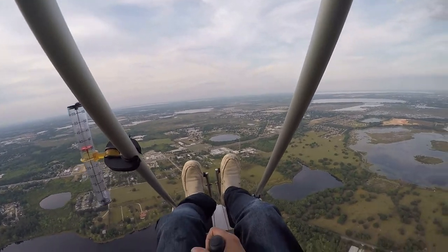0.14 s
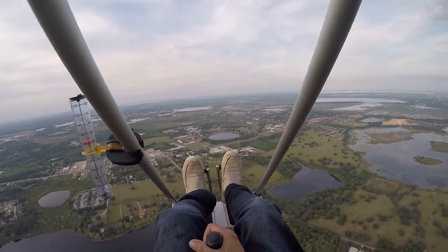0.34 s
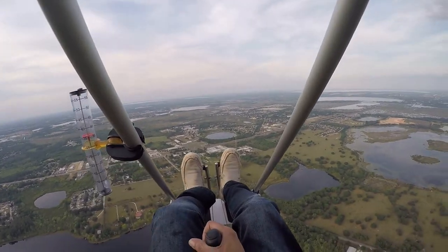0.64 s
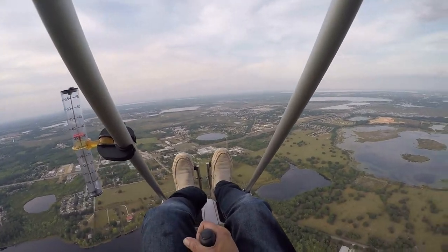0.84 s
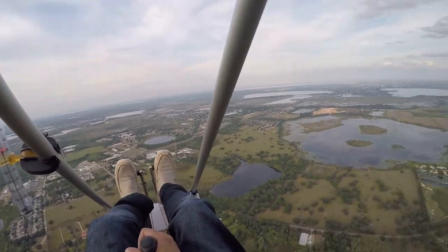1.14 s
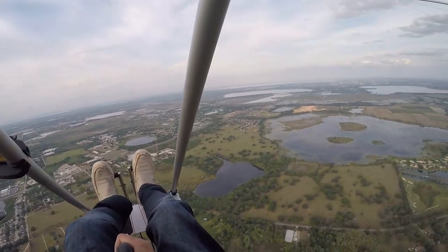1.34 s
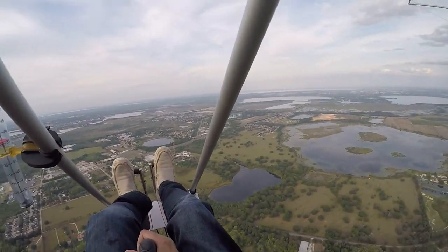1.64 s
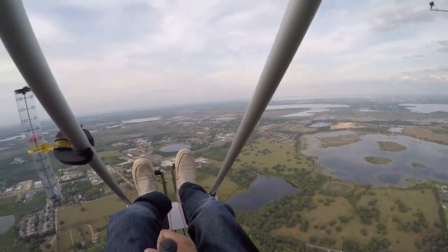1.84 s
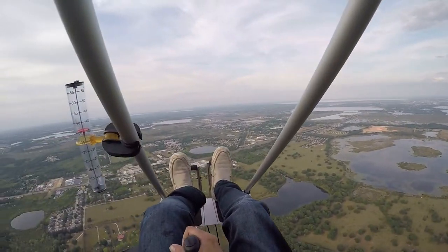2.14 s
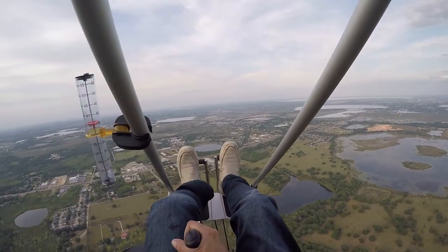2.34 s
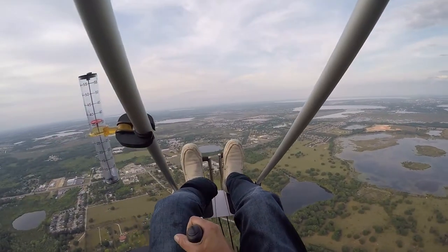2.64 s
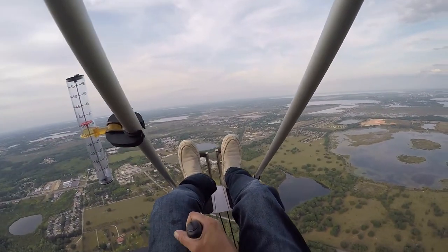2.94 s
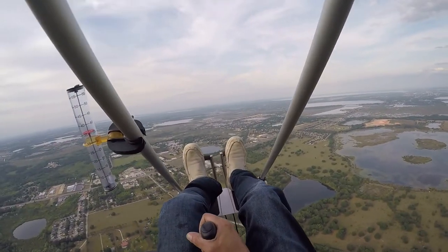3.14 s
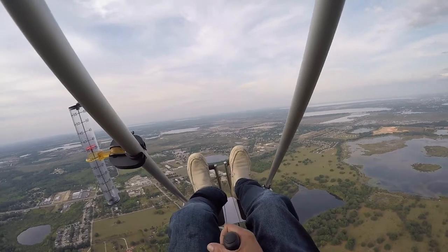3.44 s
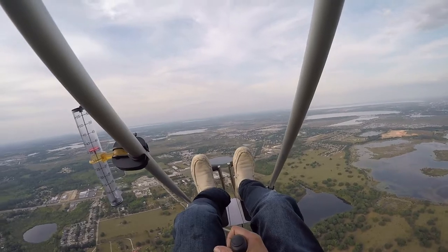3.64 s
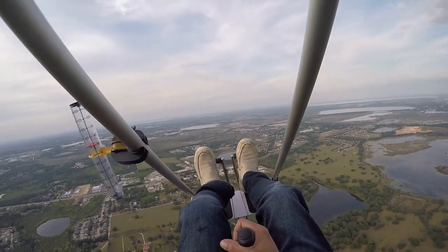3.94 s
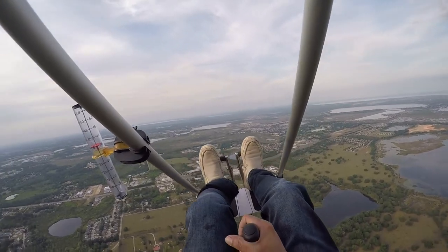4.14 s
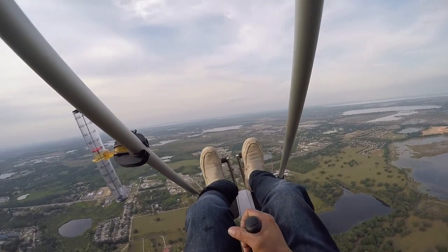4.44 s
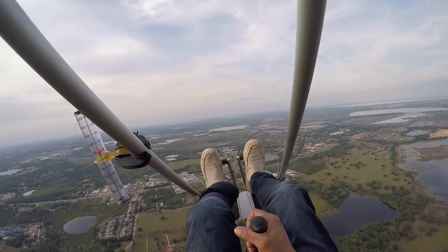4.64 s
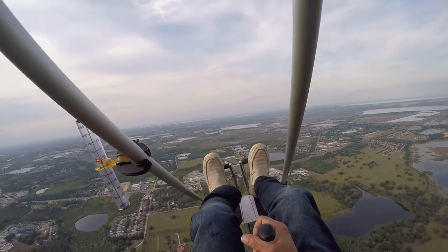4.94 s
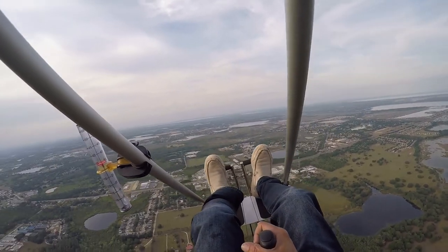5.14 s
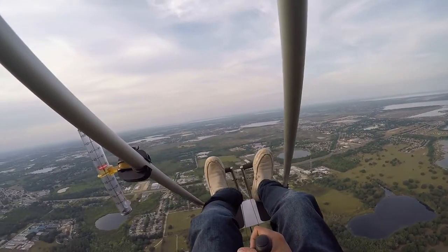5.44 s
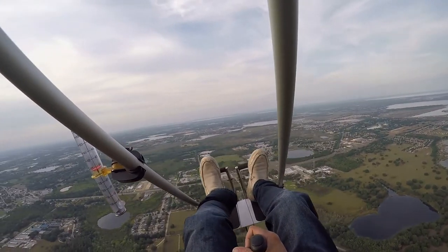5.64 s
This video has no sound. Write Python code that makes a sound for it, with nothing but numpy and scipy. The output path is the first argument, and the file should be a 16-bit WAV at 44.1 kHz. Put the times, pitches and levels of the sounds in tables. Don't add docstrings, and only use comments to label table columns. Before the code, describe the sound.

An open ultralight in flight, heard in mono from a microphone inside a closed camera housing on the pilot's head. From the start a small two-stroke engine and three-blade propeller behind give a low, buzzy drone around 100 to 200 Hz with rougher harmonics above; its pitch climbs slightly over the first one to two seconds, a faint high whine emerging, then holds, easing almost imperceptibly after 3.4 s. Wind presses constantly: deep rumble, quick fluttering gusts and irregular low thuds, strong near 0.5 s, with blunt slaps around 1.8 to 2.6 s and near 3.4 s. Above lies steady, boxy hiss with a breathy bottle-like ring and narrow coloured resonances, brighter in the first two seconds. Around 2.5 to 3.6 s engine and hiss drop back, leaving wind dominant; from 4 s the drone returns, fullest near 5.5 s, with buffeting growing again to the end. No echo.

```python
import sys
import numpy as np
from scipy import signal
from scipy.fft import rfft, irfft
from scipy.io import wavfile
from scipy.ndimage import uniform_filter1d

SR = 44100
rng = np.random.default_rng(int(sys.argv[2]) if len(sys.argv) > 2 else 0)


def rack_gain(trim_db):
    fader = np.asarray(trim_db, float)
    return 10 ** (fader / 20)


def pcm_store(signal):
    levels = np.round(np.clip(np.atleast_2d(signal), -1, 1) * 32767)
    wavfile.write(sys.argv[1], SR, levels.astype(np.int16).T)


N = 254898
TIME = np.arange(N) / SR
COARSE_TIME = TIME[::64]
FREQ = np.arange(1, N // 2 + 2) * SR / N


def unit(x):
    return x / np.sqrt(np.mean(x ** 2))


def walk(rate_hz):
    hold = int(SR / rate_hz)
    held = np.repeat(rng.standard_normal(600), hold)[:N]
    slewed = uniform_filter1d(held, hold)
    return unit(uniform_filter1d(slewed, hold))


def coloured(spectrum):
    hz, db = np.transpose(spectrum)
    gain_db = np.interp(np.log(FREQ), np.log(hz), db, left=-160, right=-160)
    return unit(irfft(rfft(rng.standard_normal(N)) * rack_gain(gain_db), N))


def cavities(modes, flicker_db, skirt):
    out = 0
    for hz, width_hz, db in modes:
        detune = (FREQ / hz - hz / FREQ) * hz / width_hz
        response = 1 / (1 + detune ** 2) ** (skirt / 2)
        ring = irfft(rfft(rng.standard_normal(N)) * response, N)
        out = out + rack_gain(db + flicker_db * walk(12)) * ring
    return unit(out)


def tones(cycles, overtones):
    out = 0
    for multiple, db, flutter_db in overtones:
        phase = 0.15 * walk(9) + 2 * np.pi * rng.random()
        level = rack_gain(db + flutter_db * walk(11))
        out = out + level * np.sin(2 * np.pi * multiple * cycles + phase)
    return np.sqrt(2) * out


def even(x, span_s, share):
    power = uniform_filter1d(x ** 2, int(span_s * SR))
    return unit(x / (power + 0.05) ** (share / 2))


def windup():
    spool_s = 0.75
    return np.exp(-TIME / spool_s)


def propeller_turns():
    start_hz, cruise_hz = 48.06, 50.73
    ease_at_s, ease_hz, ease_s = 3.42, 0.1686, 0.37
    eased = 1 - np.exp(-np.maximum(TIME - ease_at_s, 0) / ease_s)
    rate_hz = cruise_hz - (cruise_hz - start_hz) * windup() - ease_hz * eased
    return np.cumsum(rate_hz) / SR


# (time [s], engine in earshot [dB], propwash [dB], turned aside [0-1], buffeting [dB])
HEAD_POSE = [(0.0, 0.7, 1.5, 0.1, 1.4), (0.2, 0, 3.5, 0.25, -0.5), (0.75, -2.5, 2, 0.2, 0.5),
             (1.06, -2.5, 3, 0.2, 0.1), (1.12, -1, 0.5, 1, -1), (1.45, -1.5, 0, 0.86, 0.9),
             (1.75, -0.5, 2, 0.8, 0.5), (1.92, -5, -3, 1, 2.5), (2.04, -3.5, 0.8, 0.2, 1),
             (2.48, -7, -5, 0, 2), (3.09, -8, -7, 0.2, 2), (3.44, -10.5, -6, 0.26, 1),
             (3.62, -8, -4.5, 0.13, -2), (4.2, -4.5, -3, 0.01, -2), (4.7, -2, -0.4, 0.01, -0.5),
             (5.1, 0, 0.2, 0, 0.7), (5.5, 1.8, 0.5, 0.87, 1.7), (5.78, 0.5, 3, 0.9, 2.8)]
LAYER_ANSWERS = {"hum": (-23, 0.83, 0.27, 0.7, -0.1, 0.3), "blade": (-24.5, 0.72, 0.18, 1.3, -0.54, 0),
                 "tips": (-38.5, 1.94, 0.05, -1.6, -0.6, 5.5), "shared": (-28.5, 3.1, 0.1, -6, .01, -6.5),
                 "whine": (-41.5, 0.5, 0.9, -2, 0.8, -21), "rumble": (-17, -0.1, 0.1, -1, 0.8, -2.1),
                 "thud": (-20.5, 0.06, -0.33, -0.8, 0.58, -2.5),
                 "flutter": (-25.5, 0.26, .01, -0.8, 1.6, -1), "rush": (-31, 0.3, 0.23, 0, 1.4, 1.2),
                 "body": (-28.5, 0.17, 0.8, -0.2, 0.38, 1), "port": (-33, -0.34, 1.08, -3, 0.3, 5.5),
                 "top": (-48.5, -0.4, 1.18, 0, 0.3, 4), "air": (-55.5, -0.66, 1.1, 3.5, 0.5, 2.5),
                 "lid": (-39.5, -0.47, 0.96, 1, 0.5, -2)}
LEAN_DB = {"lid": 3, "air": 2.5, "body": -0.36, "port": .3, "top": 0.3, "blade": 1.25, "rush": -0.5}


def loud_db(layer):
    sits_back_s, sitting_s = 2.3, 0.45
    base_db, *shares, windup_db = LAYER_ANSWERS[layer]
    s, *pose = np.transpose(HEAD_POSE)
    pose_db = np.interp(TIME, s, np.dot(shares, pose))
    lean = np.interp(TIME, [sits_back_s, sits_back_s + sitting_s], [1, 0])
    return base_db + pose_db + windup_db * windup() + LEAN_DB.get(layer, 0) * lean


# (multiple of firing rate [-], level [dB], flutter [dB])
EXHAUST_TONES = [(1, -8.5, 3), (4, -0.4, 0.77), (14, -35.5, 6)]
# (multiple of firing rate [-], level [dB], flutter [dB])
WHINE_TONES = [(12, -7, 1.2), (18, -.5, .8)]
# (multiple of firing rate [-], level [dB], flutter [dB])
PIPE_TONES = [(14, -4, 1.5), (15, -4, 1.5), (17, -7, 1.5)]


def exhaust():
    firings = 2 * propeller_turns()
    hum = rack_gain(loud_db("hum")) * tones(firings, EXHAUST_TONES)
    high = tones(firings, WHINE_TONES) + tones(firings, PIPE_TONES)
    return hum + rack_gain(loud_db("whine")) * high


# (multiple of turns [-], level [dB],
# flutter [dB])
BLADE_TONES = [(3, 1.06, 0.5), (4, -1.5, 1.0)]
# (multiple of turns [-], level [dB],
# flutter [dB])
TIP_TONES = [(9, -2, 2), (10, 0, 1.2), (12, -2.5, 1), (30, -13, 1)]


def propeller():
    turns = propeller_turns()
    blades = rack_gain(loud_db("blade")) * tones(turns, BLADE_TONES)
    return blades + rack_gain(loud_db("tips")) * tones(turns, TIP_TONES)


# (multiple of six a turn [-], level [dB], flutter [dB])
SHARED_TONES = [(1, 1.4, -0.6), (3, -17, 3)]


def shared_tones():
    return rack_gain(loud_db("shared")) * tones(6 * propeller_turns(), SHARED_TONES)


# (time [s], swell, negative for a lull [dB], eddy size [Hz], length [s])
EDDY_SWELLS_AND_LULLS = [(0.082, 7, 35, 0.044), (0.314, 7, 35, 0.03), (0.396, 6.5, 45, 0.022), (0.573, 11, 65, 0.022),
                         (0.505, 12, 131, 0.045), (0.71, 5.5, 35, 0.056), (.77, 5.5, 85, .03), (0.871, 7, 35, 0.032),
                         (1.03, 4, 85, 0.097), (1.26, 3, 40, 0.068), (1.444, 3, 35, 0.023), (1.576, 8, 90.5, .03),
                         (1.662, 6, 60, .03), (2.039, 4, 70, .04), (2.23, 6.5, 55, 0.037), (2.76, 5, 148, 0.093),
                         (2.97, 4, 35, .03), (2.458, 4.5, 170, 0.14), (3.144, 3.5, 50, 0.043),
                         (3.432, 6.5, 400, 0.021), (3.53, 2, 85, .04), (3.703, 10, 60, 0.035), (3.84, 4, 70, 0.035),
                         (4.315, 5.5, 500, .03), (4.325, 8, 40, 0.026), (4.623, 6, 50, 0.018), (5.14, 1, 32, 0.047),
                         (5.4, 5.5, 85, .04), (4.85, 3, 35, .06), (5.71, 3.5, 200, .04),
                         (.34, -13, 95, 0.058), (.62, -8, 40, 0.038), (0.814, -6, 45, .03), (.9, -4, 250, .05),
              (1.372, -13, 30, 0.027), (1.63, -5, 90, .03), (1.973, -10, 40, 0.036), (2.126, -6, 500, .05),
              (3.002, -14, 35, 0.019), (3.064, -6, 220, 0.023), (3.538, -3, 35, .04), (3.62, -3, 150, 0.09),
              (3.666, -9, 85, 0.033), (3.78, 1, 35, 0.027), (4.5, -1, 110, 0.065), (4.12, -3, 110, .04),
              (4.82, 0, 550, .1), (5.25, -0.5, 550, .08), (4.05, -0.5, 550, .08), (4.8, -7, 85, 0.056),
              (4.928, -12, 80, 0.059), (5.045, -7, 32, .04), (5.14, -7, 95, 0.044), (5.514, -5, 80, .06)]


def swell_db(hz):
    reach_octaves = 0.64
    s, db, size_hz, span_s = np.transpose(EDDY_SWELLS_AND_LULLS)[:, :, None]
    size_gap = np.log2(size_hz / hz) / reach_octaves
    time_gap = (COARSE_TIME - s) / span_s
    felt_db = db * np.exp(-size_gap ** 2 - time_gap ** 2)
    return np.interp(TIME, COARSE_TIME, felt_db.sum(axis=0))


# (frequency [Hz], density [dB per Hz])
RUMBLE_SPECTRUM = [(12, -18), (25, 0), (38, 3), (55, -1.5), (80, -7)]
THUD_SPECTRUM = [(40, -29), (65, 0.3), (95, -1.5), (130, -7), (190, -18.5)]
FLUTTER_SPECTRUM = [(100, -25), (160, 0.2), (220, 0), (300, -2.5), (380, -10), (520, -12)]
RUSH_SPECTRUM = [(300, 1.5), (450, -0.5), (600, -3), (800, -7.5), (1100, -12.5), (1500, -24)]
# (time [s], peak [dB], frequency [Hz], length [cycles])
PORT_SLAPS = [(0.157, -7.5, 140, 1.1), (1.38, -8, 129, 1.5), (1.433, -9, 120, 0.86), (1.792, 5, 103, 0.56),
              (1.834, 3, 220, 0.42), (2.025, -1.5, 90, 1.2), (2.053, 3.5, 129, 0.71), (2.22, -7, 128, 1.1),
              (2.331, -10, 125, 0.74), (2.375, 0.5, 148, 0.73), (2.499, -2, 133, 1), (2.608, -6, 112, 0.81),
              (3.028, -9, 120, 1.5), (3.291, -11.5, 108, 1.3), (3.356, -4, 140, 0.35),
              (3.427, -2, 115, 0.57), (3.58, -6, 60, 1.6), (4.915, -11, 128, 3.4)]


def wind():
    rumble_db = loud_db("rumble") + swell_db(36)
    thud_db = loud_db("thud") + swell_db(80)
    flutter_db = loud_db("flutter") + swell_db(200)
    rush_db = loud_db("rush") + swell_db(480)
    gust = walk(32)
    rumble = rack_gain(rumble_db - 0.3) * even(coloured(RUMBLE_SPECTRUM), 0.066, 0.67)
    thud = rack_gain(thud_db + 0.37 + 1.6 * gust) * even(coloured(THUD_SPECTRUM), 0.05, 0.4)
    flutter = rack_gain(flutter_db + 2.5 + 1.82 * gust) * even(coloured(FLUTTER_SPECTRUM), 0.0233, 0.35)
    rush = rack_gain(rush_db + 0.54 * gust + 0.35 * walk(30)) * coloured(RUSH_SPECTRUM)
    buffeting = rumble + thud + flutter
    for s, db, hz, cycles in PORT_SLAPS:
        swing = hz * (TIME - s)
        reach = np.exp(-(2 * swing / cycles) ** 2)
        slap = rack_gain(db) * np.cos(2 * np.pi * swing + 1) * reach
        buffeting = buffeting * (1 - 0.18 * reach) + slap
    return buffeting + rush


# (frequency [Hz], width [Hz], level [dB])
BODY_MODES = [(1735, 740, 0), (2300, 520, -7.5), (2610, 470, -2), (3058, 390, -1)]
PORT_MODES = [(3613, 280, -2), (3742, 350, 0.7), (3938, 144, -5.5)]
TOP_MODES = [(4610, 182, 2.5), (5280, 410, -5.5), (5640, 290, -4.5), (6360, 320, -7), (6950, 650, -11),
             (8240, 790, -11), (10550, 760, -12.5), (12240, 690, -18.5), (14500, 1500, -54)]


def hiss():
    gust_db = 0.052 * walk(22.04) + 0.5 * walk(60)
    body = rack_gain(loud_db("body") - 0.7) * cavities(BODY_MODES, 1.0, 1.69)
    port = rack_gain(loud_db("port")) * cavities(PORT_MODES, 0.33, 2.32)
    top = rack_gain(loud_db("top") + 0.15 * walk(40)) * cavities(TOP_MODES[:5], 0.69, 1.5)
    air = rack_gain(loud_db("air") - 3.5 + 0.41 * walk(43)) * cavities(TOP_MODES[5:], 0.99, 1.3)
    return rack_gain(gust_db) * (body + port + top + air)


# (frequency [Hz], width [Hz], level [dB])
LID_MODE = [(1444, 155, 0.1)]
# (time [s], swell [dB])
LID_BREATHS = [(.08, 8), (.24, -11), (.97, 3), (1.18, 0), (1.24, 7), (1.38, 6), (1.85, -4), (2.16, -8),
               (2.26, 4), (2.44, 3), (3.06, -7), (3.29, 6.5), (3.40, 6), (4.43, -4)]


def lid():
    breath_s = 0.023
    s, db = np.transpose(LID_BREATHS)[:, :, None]
    breaths_db = db * np.exp(-((COARSE_TIME - s) / breath_s) ** 2)
    breath_db = np.interp(TIME, COARSE_TIME, breaths_db.sum(axis=0))
    return rack_gain(loud_db("lid") + breath_db) * cavities(LID_MODE, 0.2, 1.4)


def scene():
    engine = exhaust() + propeller() + shared_tones()
    return (engine + wind() + hiss() + lid())[None]


def band_limit(x):
    return signal.sosfilt(signal.butter(12, 15180, fs=SR, output="sos"), x)


def record(dry):
    wall = signal.butter(2, 15500, fs=SR, output="sos")
    dulled = signal.sosfilt(wall, dry)
    rounded = dulled / (1 + (dulled / 0.95) ** 4) ** 0.25
    return band_limit(rounded)


dry = scene()
out = record(dry)
pcm_store(out)
```